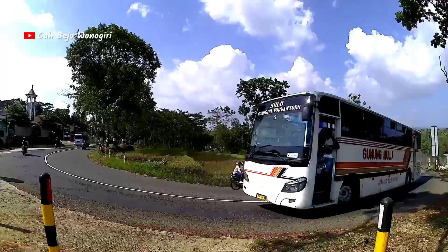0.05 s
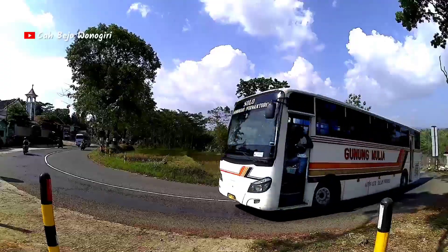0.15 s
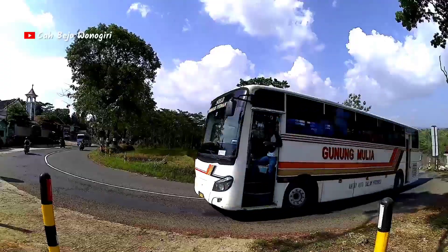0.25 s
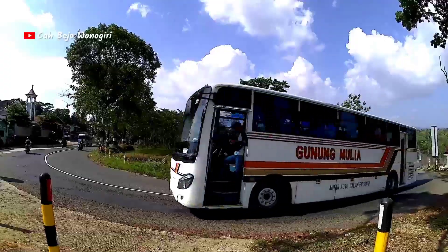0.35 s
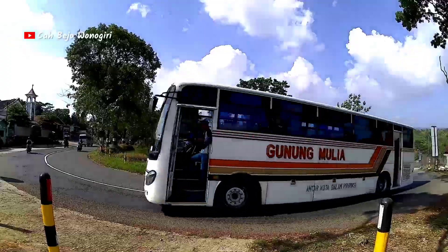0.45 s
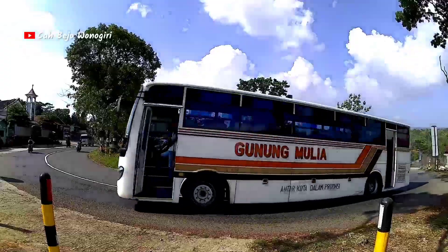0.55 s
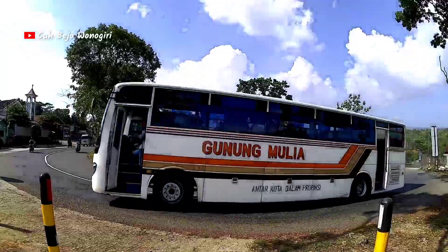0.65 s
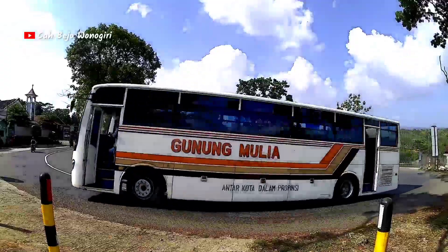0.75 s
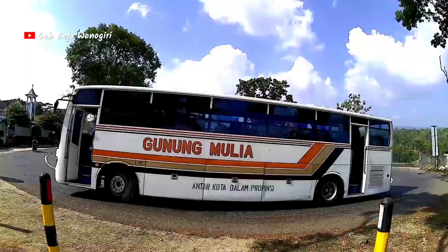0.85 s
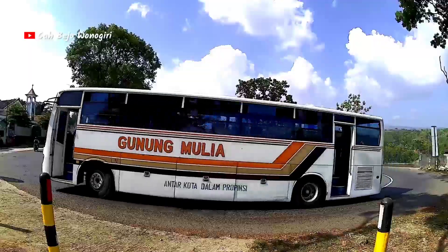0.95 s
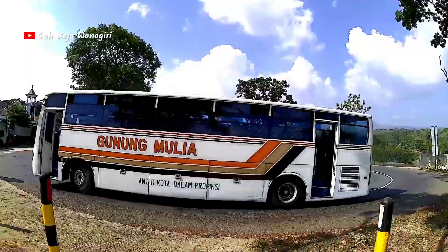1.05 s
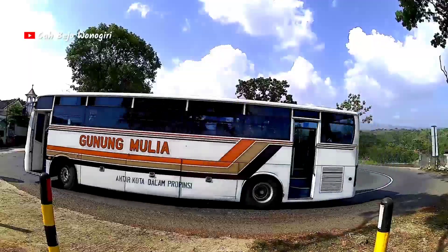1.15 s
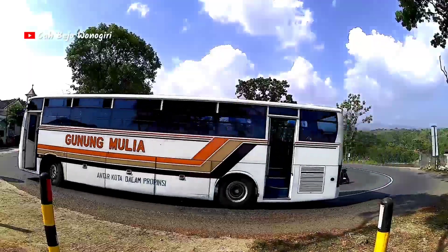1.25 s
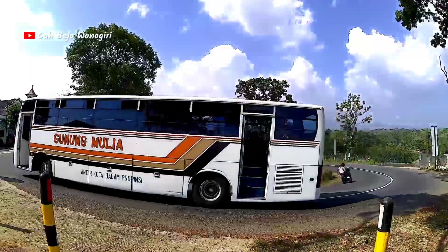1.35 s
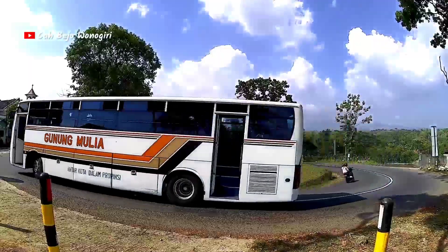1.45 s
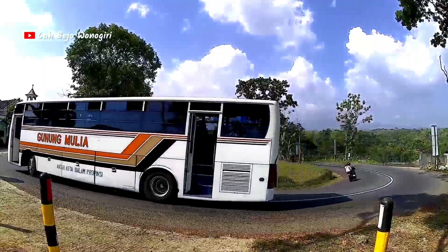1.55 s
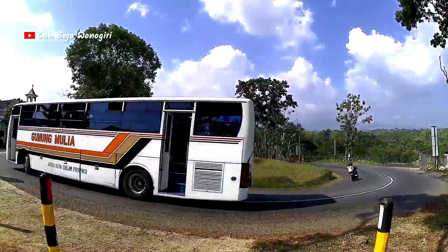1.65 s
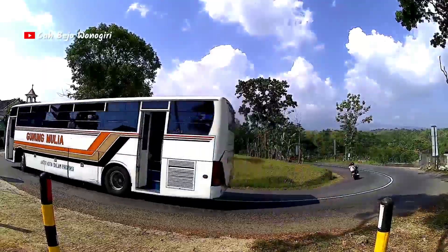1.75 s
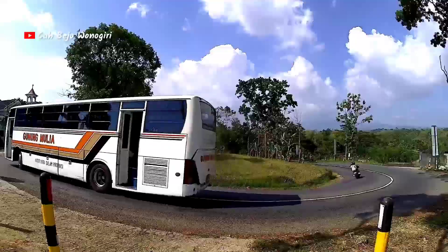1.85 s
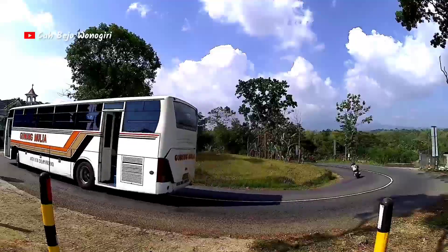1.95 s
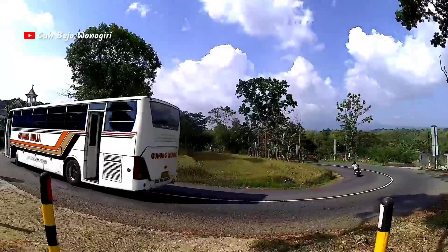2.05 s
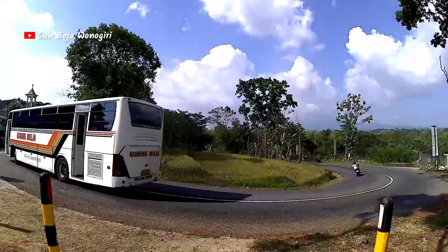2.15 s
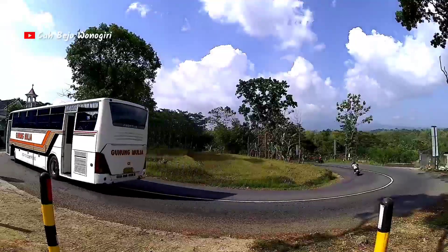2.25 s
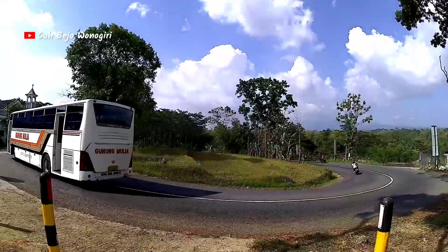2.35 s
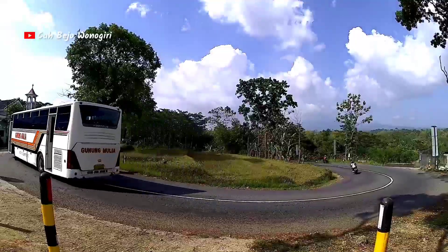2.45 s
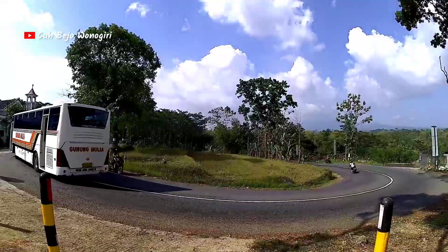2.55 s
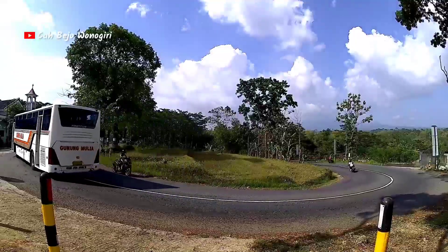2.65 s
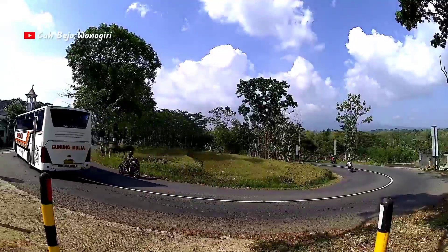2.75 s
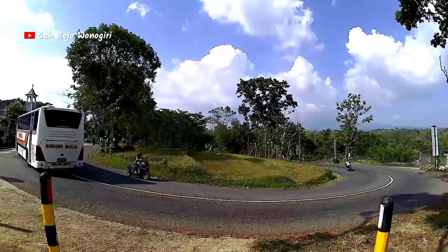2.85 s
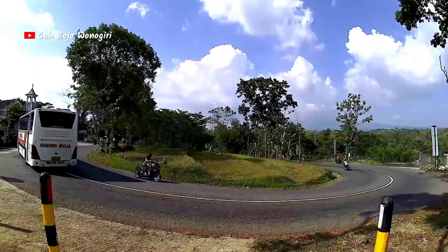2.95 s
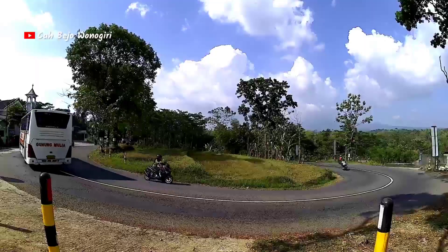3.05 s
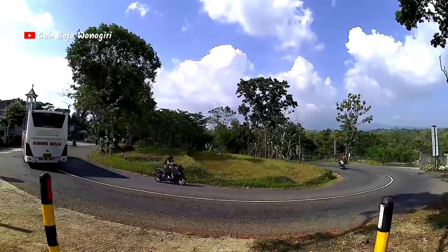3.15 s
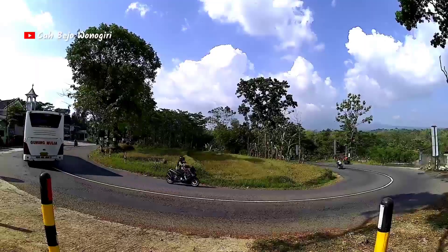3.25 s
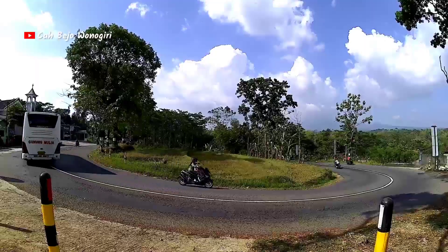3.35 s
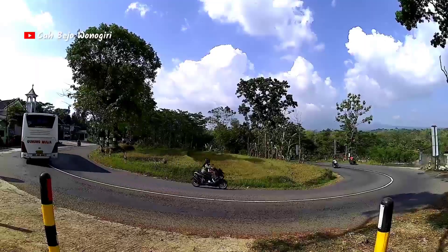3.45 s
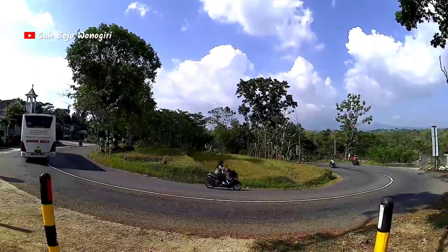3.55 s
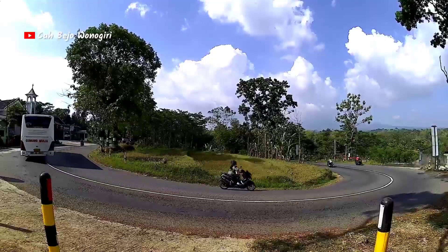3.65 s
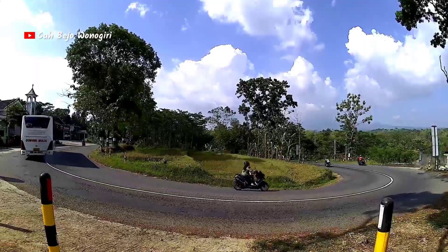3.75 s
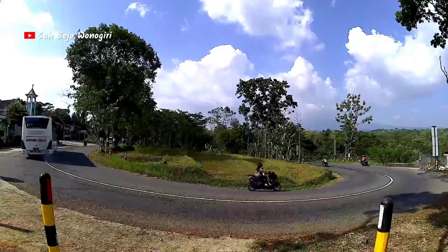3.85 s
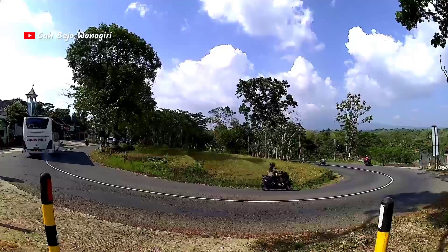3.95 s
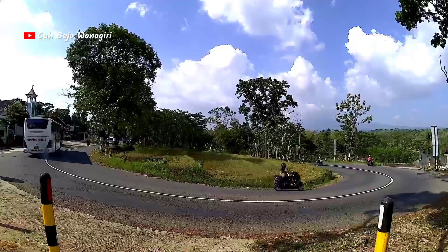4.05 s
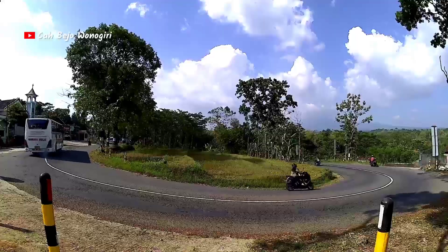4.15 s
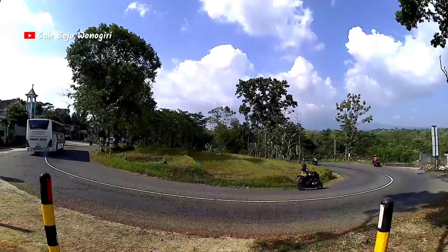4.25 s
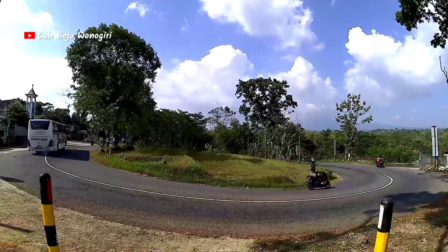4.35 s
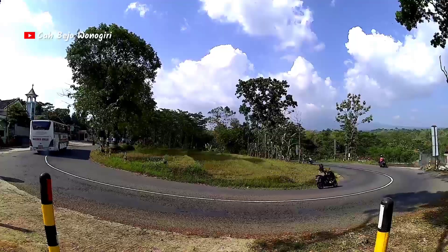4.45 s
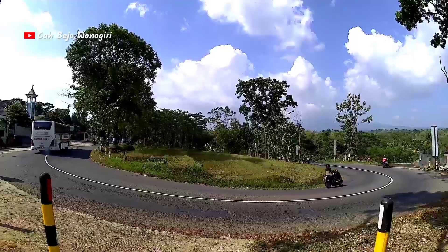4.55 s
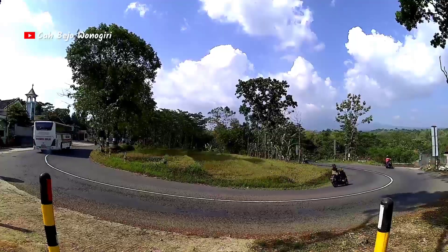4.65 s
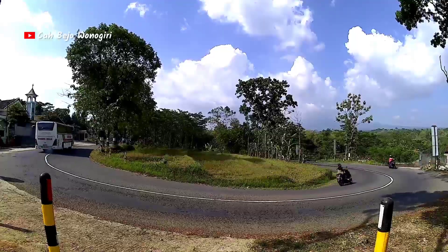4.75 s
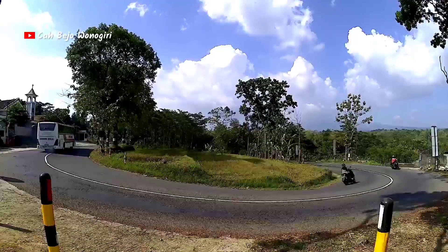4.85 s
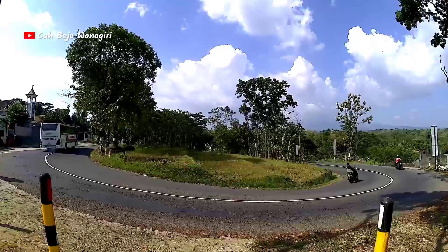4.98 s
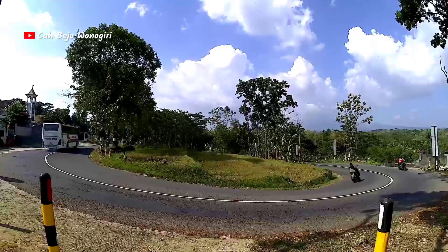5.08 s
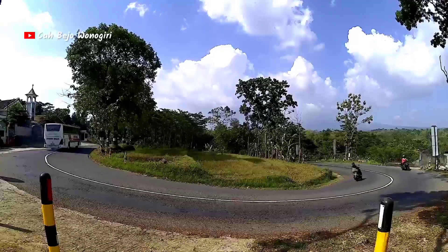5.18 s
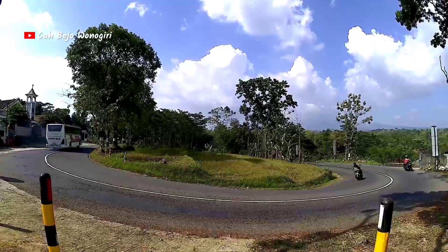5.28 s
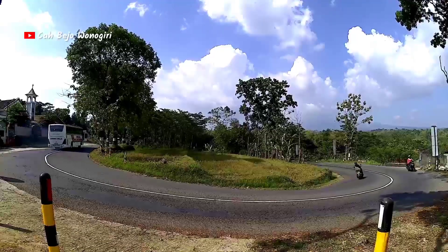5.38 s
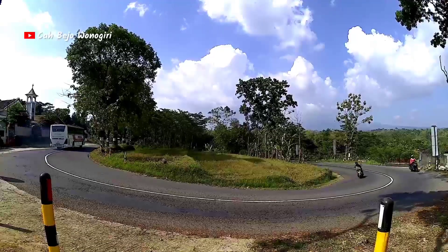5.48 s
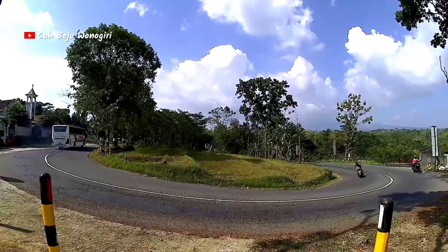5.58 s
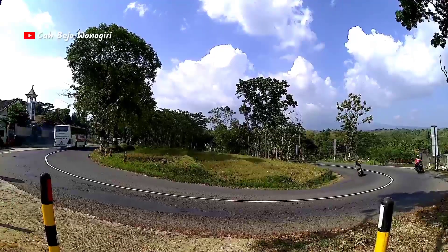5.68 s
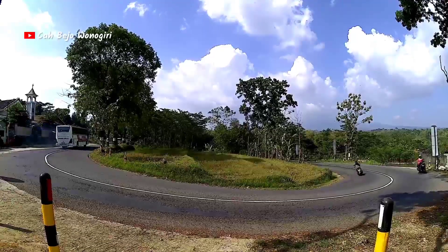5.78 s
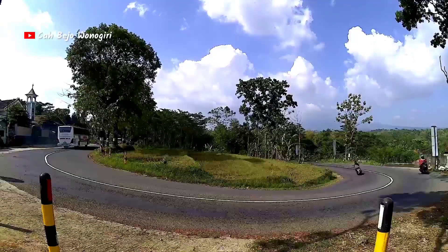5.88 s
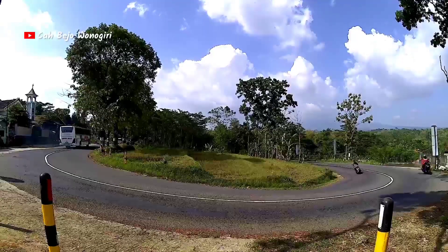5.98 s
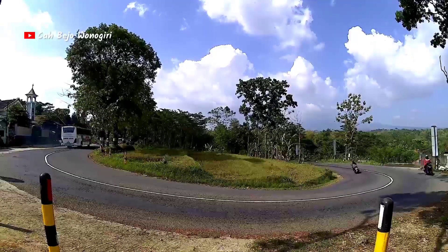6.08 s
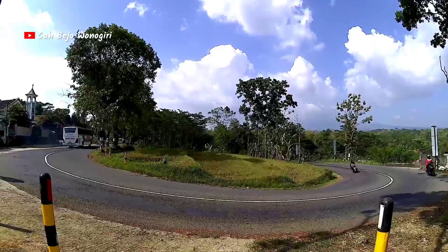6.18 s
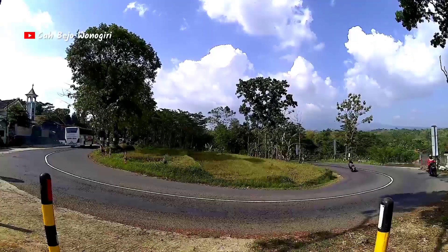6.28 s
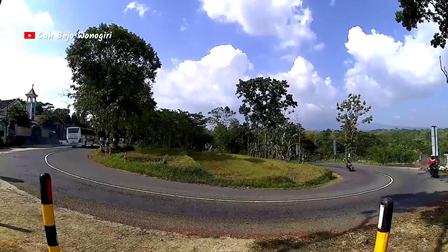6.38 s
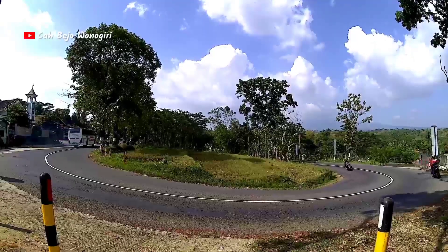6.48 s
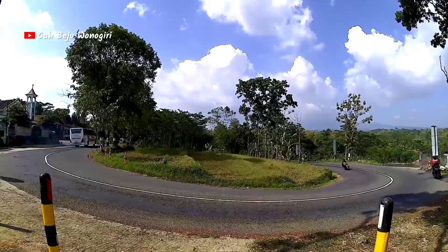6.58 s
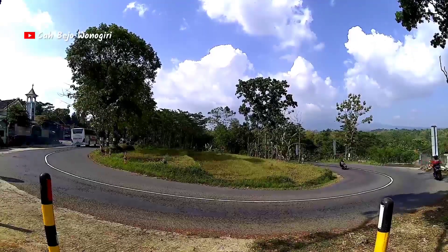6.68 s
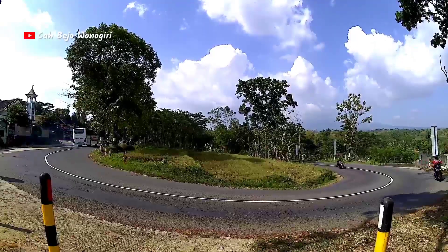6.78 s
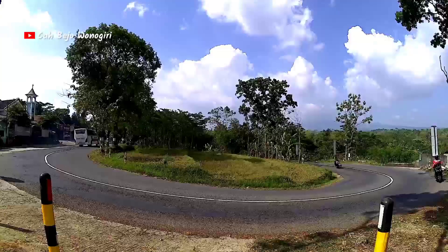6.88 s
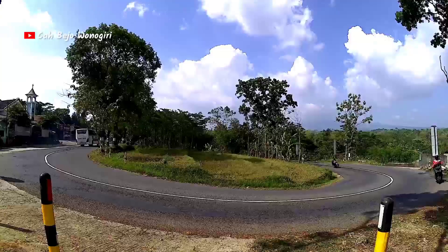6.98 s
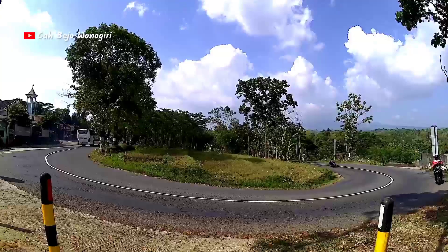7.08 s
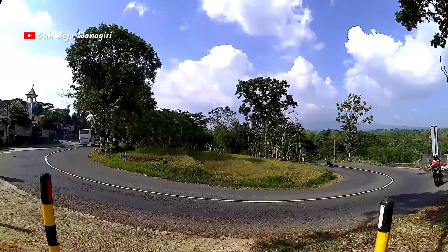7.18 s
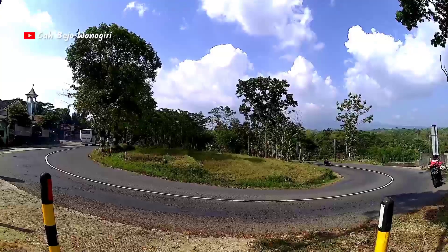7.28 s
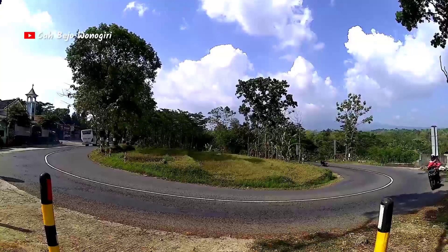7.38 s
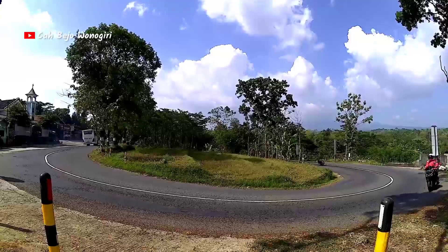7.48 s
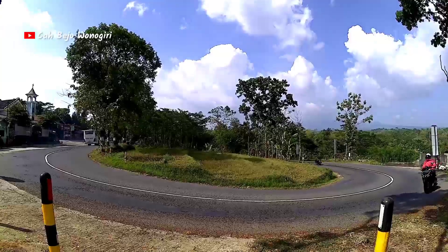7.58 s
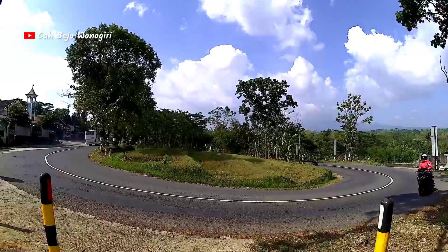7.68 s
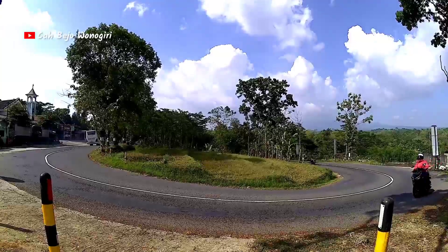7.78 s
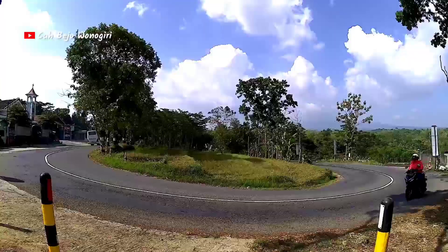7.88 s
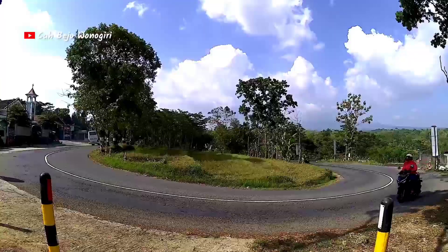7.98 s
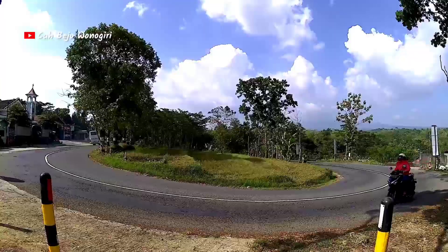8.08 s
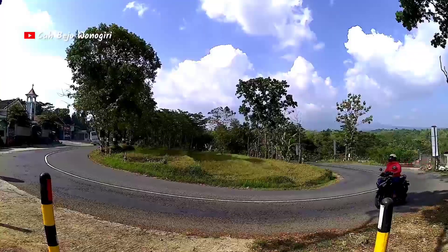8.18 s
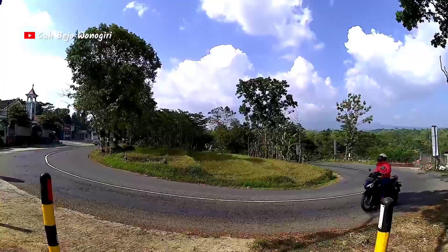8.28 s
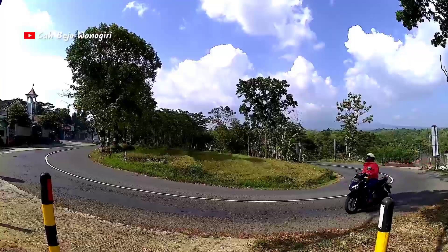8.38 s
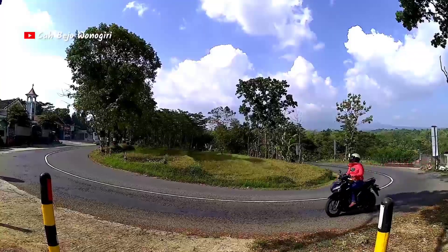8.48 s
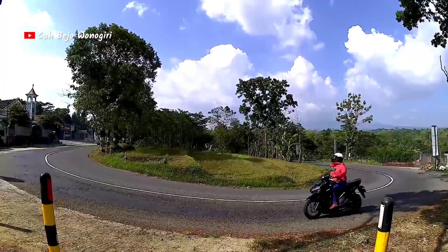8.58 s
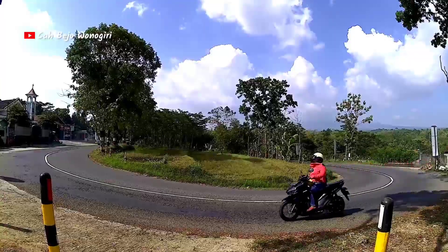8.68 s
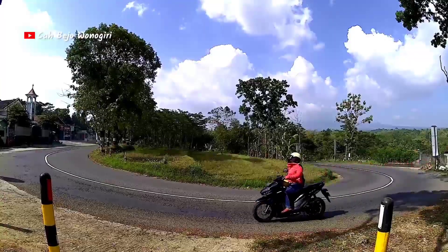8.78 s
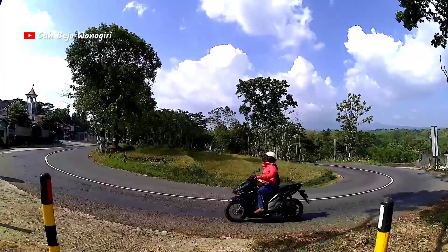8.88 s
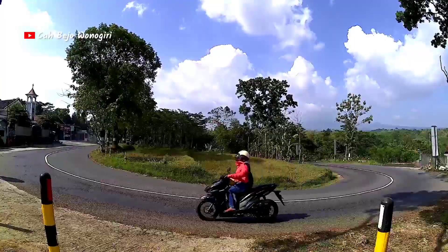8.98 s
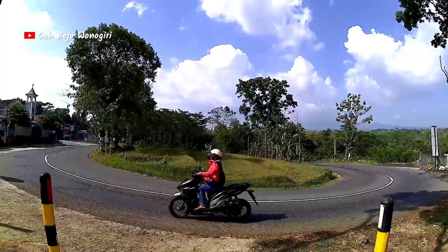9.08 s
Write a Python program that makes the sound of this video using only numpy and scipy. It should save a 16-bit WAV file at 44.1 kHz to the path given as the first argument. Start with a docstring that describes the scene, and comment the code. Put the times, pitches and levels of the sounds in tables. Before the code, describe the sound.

A heavy six-cylinder bus engine throbs loudly from the start, with tyre hiss, low rumble and a fan whine as the tail goes by. One buzzy horn tap comes about a second in. The engine then drops away up the road while a small motorbike putters across the far lane. Sharp wind buffets follow, and a nearer scooter swells last. Roadside microphone, telephone-like band, clipping on the toot and boom.

```python
"""A six-cylinder diesel bus, pulsed by its firings, rounds a bend a few metres away, toots once and pulls off uphill.
Exhaust boom and fan are tones locked to the firings; pulses ring the block; tyres and rumble are shaped noise.
Motorcycles and a scooter go by as single-cylinder pulse trains with gas hiss; wavering tones whine, a belt hisses.
Shaped noise makes wind and gusts. The narrow-band microphone overloads on the horn and the loudest boom.
"""
import sys
import numpy as np
from scipy import signal
from scipy.fft import rfft, irfft, next_fast_len
from scipy.io import wavfile
from scipy.ndimage import uniform_filter1d

SR = 44100
rng = np.random.default_rng(int(sys.argv[2]) if len(sys.argv) > 2 else 0)


def generate_wav(sig):
    """Save sig (samples, or channels by samples) to the path in sys.argv[1] as 16-bit PCM at SR."""
    pcm = np.round(np.clip(np.atleast_2d(sig).T, -1, 1) * 32767).astype(np.int16)
    wavfile.write(sys.argv[1], SR, pcm)


N = 402619
T = np.arange(N) / SR


def undb(db):
    """Decibels to gain."""
    return 10 ** (np.asarray(db) / 20)


def level(x, db=0):
    """Scale to an rms level."""
    return x * undb(db) / np.sqrt(np.mean(x ** 2))


def noise():
    """White noise."""
    return rng.standard_normal(N)


def walk(rate_hz):
    """Random levels held 1 / rate_hz seconds and smoothed twice; spread near 1."""
    hold = int(SR / rate_hz)
    steps = np.repeat(rng.standard_normal(N // hold + 1), hold)
    return 1.354 * uniform_filter1d(uniform_filter1d(steps, hold), hold)[:N]


def filtered(x, response):
    """Apply a frequency response given as a function of Hz; rms 1."""
    size = next_fast_len(N + SR // 2)
    hz = np.arange(size // 2 + 1) * SR / size + 1  # offset avoids 0 Hz
    return level(irfft(rfft(x, size) * response(hz), size)[:N])


def colour(x, points):
    """Shape by (frequency [Hz], level [dB]) points, falling away beyond both ends; rms 1."""
    hz, db = np.transpose(points)

    def response(f):
        gain = undb(np.interp(np.log(f), np.log(hz), db))
        return gain * np.minimum(1, np.minimum(f / hz[0], hz[-1] / f)) ** 2

    return filtered(x, response)


def resonate(x, modes):
    """Ring a set of (frequency [Hz], width [Hz], level [dB]) resonances; rms 1."""
    def response(f):
        return sum(undb(db) / (1 + 1j * (f * f - hz * hz) / (f * width)) for hz, width, db in modes)

    return filtered(x, response)


def passing(at_s, db, travel_s, fall_db):
    """Gain of a source driving by: falls fall_db per doubling of distance; travels its nearest distance in travel_s."""
    distance = np.hypot(1, (T - at_s) / travel_s)
    return undb(db - fall_db * np.log2(distance))


def swell(at_s, db, half_length_s):
    """Flat-topped rise and fall of gain, 6 dB down at half_length_s from its peak."""
    return undb(db) / (1 + ((T - at_s) / half_length_s) ** 4)


def firings(hz, pattern_db, scatter_db):
    """One pulse per firing, each cylinder with its own strength; also the running count of firings."""
    count = np.cumsum(hz) / SR
    at = np.flatnonzero(np.diff(np.floor(count)))
    size = undb(np.resize(pattern_db, len(at)) + scatter_db * noise()[:len(at)])
    # split each pulse over two samples to place it between them
    late = (np.ceil(count[at]) - count[at]) * SR / hz[at]
    pulses = np.zeros(N)
    pulses[at] = size * (1 - late)
    pulses[at + 1] = size * late
    return pulses, count


def puffs(pulses, decay_s):
    """A short, decaying burst of noise after each pulse."""
    envelope = signal.lfilter([1], [1, -np.exp(-1 / (decay_s * SR))], pulses)
    return envelope * noise()


def revs():
    """Bus firing rate [Hz]: a steady sag into the bend that turns smoothly into a steady climb."""
    start_hz, sag_hz_per_s, climb_hz_per_s = 75.5, 2.05, 5.0
    pull_away_s, pickup_s = 2.93, .55
    pulling_s = pickup_s * np.logaddexp(0, (T - pull_away_s) / pickup_s)
    return start_hz - sag_hz_per_s * T + (sag_hz_per_s + climb_hz_per_s) * pulling_s


# Boom at the firing rate, swelling and fading as the bus goes by: (time [s], level [dB])
BOOM = [(0, -19), (.15, -22), (.3, -12), (.95, -15), (1.16, -11), (1.38, -10), (1.5, -4.5), (1.6, -8.5),
        (1.7, -10), (1.92, -11), (2.03, -11.5), (2.15, -11), (2.45, -18.5), (3.3, -13), (3.6, -16.5),
        (3.9, -13.5), (4.2, -17.5), (5.1, -21), (5.6, -18.5), (6.2, -22.5), (8.2, -26), (9.13, -29.5)]


def exhaust_boom(count):
    """One sine cycle per firing, its level following the BOOM curve with a slight waver."""
    boom_db = np.interp(T, *np.transpose(BOOM))
    return level(np.sin(2 * np.pi * count), boom_db + 0.36 * walk(15))


# Tones locked to the engine: firing harmonics, tones between them, and the fan's third harmonic (40);
# the firing rate is 6 times the cycle rate:
# (multiple of cycle rate [-], relative level [dB], strongest at firing rate [Hz], half-width [Hz])
LOCKED_TONES = [(9, -2, 80.5, 4.5), (10, -6, 73, 3), (11, -8, 74.5, 2), (12, 2, 71.5, 1), (12, -8, 87, 4),
                (14, -3, 76.5, 4), (18, -7, 74, 1.5), (18, -6, 85, 3), (20, -8, 79, 2.5),
                (22, -4.5, 71.5, 1), (24, -9, 85, 3.5), (26, -10, 86, 3), (27, -12, 79, 3),
                (29, -12, 74, 6), (33, -10, 87, 4), (40, -7.5, 72, 2.6)]


def locked_tones(count, hz, waver_db=2.5):
    """Sines at multiples of the engine cycle rate, each swelling as the revs near its own firing rate."""
    cycles = count / 6  # six firings per engine cycle
    out = 0
    for multiple, db, best_hz, half_width_hz in LOCKED_TONES:
        nearness = 1 / (1 + ((hz - best_hz) / half_width_hz) ** 4)
        tone = np.sin(2 * np.pi * (multiple * cycles + rng.random()))
        out = out + undb(db + waver_db * walk(5.6)) * nearness * tone
    return out


# Tailpipe colour: (frequency [Hz], level [dB])
TAILPIPE_COLOUR = [(40, -19.5), (85, -11.5), (120, 0), (180, 1), (250, -6.5), (350, -7), (480, -16),
                   (700, -19), (1200, -26)]


def tailpipe(pulses, count, hz, gas_db=-4):
    """Each firing puffs gas noise through the pipe; engine-locked tones ride on it."""
    gas = colour(puffs(pulses, decay_s=0.0061), TAILPIPE_COLOUR) * undb(gas_db)
    return (gas + locked_tones(count, hz)) * passing(at_s=2, db=-21, travel_s=2.3, fall_db=5)


# Fan tones: (multiple of blade rate [-], relative level [dB])
FAN_TONES = [(1, 0), (2, -10)]


def fan(count, blades_per_firing=2.221):
    """Blade-rate harmonics geared to the crank; the rear grille beams them at the verge."""
    blade_phase = 2 * np.pi * blades_per_firing * count
    tones = sum(undb(db + 0.99 * walk(3.4)) * np.sin(k * blade_phase) for k, db in FAN_TONES)
    by = passing(at_s=4.5, db=-29, travel_s=0.8, fall_db=3)
    grille_beam = swell(at_s=2.4, db=-20, half_length_s=.6)
    return level(tones) * (by + grille_beam)


# Resonances of engine block and body panels: (frequency [Hz], width [Hz], level [dB])
BLOCK_MODES = [(500, 48, -2), (833, 150, 9), (1107, 130, -2.5), (1630, 280, -5.5), (1900, 94, -8),
               (3040, 160, -22.5)]


def block_clatter(pulses, clatter_db=-6):
    """Each firing knocks the block; loose parts add a random rattle."""
    knocks = level(pulses, -6.0) + level(puffs(pulses, decay_s=0.028))
    return resonate(knocks, BLOCK_MODES) * undb(clatter_db + 1.6 * walk(11))


# Tyre roar colour, for bus and two-wheelers: (frequency [Hz], level [dB])
ROAR_COLOUR = [(400, -8.5), (480, -8), (610, -4), (680, -8), (830, -7), (920, -9.5), (1080, -8.5),
               (1300, -11), (2030, -12), (2340, -21.5), (3050, -22.5), (3400, -29), (3850, -45)]


def tyre_roar(patchy_db=1.0, tyres_db=2.0, sway_db=0.5):
    """Tyre noise in half-octave bands, each surging on its own with the patches of the road."""
    size = next_fast_len(N)
    spectrum = rfft(colour(noise(), ROAR_COLOUR), size)
    hz = np.arange(len(spectrum)) * SR / size + 1
    place = np.clip(2 * np.log2(hz / 400), 0, 6)  # half-octaves above 400 Hz
    out = 0
    for band in range(7):
        share = np.maximum(1 - abs(place - band), 0)
        out = out + irfft(spectrum * share, size)[:N] * undb(patchy_db * walk(18))
    return level(out) * undb(tyres_db + sway_db * walk(16))


# Wheel rumble colour: (frequency [Hz], level [dB])
RUMBLE_COLOUR = [(50, -13), (90, 0), (140, 1.5), (200, -6), (260, -6), (330, -7.5), (470, -7.5), (600, -27),
                 (900, -27)]


def wheel_rumble():
    """Low rolling noise that rises and falls as the bus goes by."""
    return colour(noise(), RUMBLE_COLOUR) * passing(at_s=1.75, db=-15.5, travel_s=1.08, fall_db=3.5)


# Six cylinders in firing order: (strength [dB])
CYLINDERS_DB = [2.5, -2.5, -4, -2, -7, -4]


def bus():
    """Firings drive exhaust, fan and block; wheels roar and rumble; house fronts throw back all but the boom."""
    hz = revs()
    pulses, count = firings(hz * (1 + .001 * walk(12)), CYLINDERS_DB, scatter_db=0.5)
    # the body screens the tailpipe and fan until the tail swings round
    screen_db, tail_round_s, swing_s = -4, 0.6, 0.23
    screened = undb(screen_db / (1 + np.exp((T - tail_round_s) / swing_s)))
    rear = (tailpipe(pulses, count, hz) + fan(count)) * screened
    clatter = block_clatter(pulses)
    near_road = (clatter + tyre_roar()) * passing(at_s=1.38, db=-21, travel_s=0.69, fall_db=3.5)
    grille_clatter = clatter * swell(at_s=2.1, db=-28, half_length_s=0.68)
    running = rear + near_road + grille_clatter + wheel_rumble()
    far_bend = swell(at_s=6.15, db=-12, half_length_s=0.58)  # relative to direct sound
    return exhaust_boom(count) + running * (1 + far_bend)


# Steady breeze: (frequency [Hz], level [dB])
WIND_COLOUR = [(10, -1.5), (20, -4), (32, -0.5), (55, -6.5), (100, -13.5), (200, -27.5), (500, -45)]
# Brighter buffets: (frequency [Hz], level [dB])
BUFFET_COLOUR = [(20, -2.5), (60, -3), (130, -3.5), (200, -9.5), (350, -17), (700, -41)]
# Gaussian gusts: (time [s], level [dB], standard deviation [s], brightness [0-1])
GUSTS = [(2.097, -18.5, 1.6, 0), (2.839, -11.5, 0.054, 0.3), (5.507, -31.5, 0.2, 0.1),
         (7.012, -16, 0.036, 0.98), (7.206, -8.5, 0.019, 0.3), (7.433, -19, 0.031, 0.84),
         (7.547, -10, 0.023, 0.92), (7.547, -17, 0.44, 0.3), (7.626, -13.5, 0.014, 0.94),
         (8.034, -25, 0.027, 0.1), (8.65, -20.5, 0.079, 0)]


def wind(breeze_db=-21.5):
    """A steady breeze flutters on the microphone; each gust is split between deep and bright noise."""
    deep, bright = undb(breeze_db), 0
    for at_s, db, spread_s, brightness in GUSTS:
        gust = undb(db) * np.exp(-.5 * ((T - at_s) / spread_s) ** 2)
        deep = deep + (1 - brightness) * gust
        bright = bright + brightness * gust
    return colour(noise(), WIND_COLOUR) * deep + colour(noise(), BUFFET_COLOUR) * bright


def single_cylinder(ride, silencer, gas_db, scatter_db):
    """A small four-stroke going by: pulses through the silencer, a hiss of gas after each."""
    at_s, db, travel_s, firing_hz, rise_hz_per_s = ride
    hz = firing_hz + rise_hz_per_s * (T - at_s)
    pulses, _ = firings(hz * (1 + .002 * walk(15)), [0], scatter_db)
    highpass = signal.butter(2, 700, "high", fs=SR, output="sos")
    gas = signal.sosfilt(highpass, puffs(pulses, decay_s=0.027))
    return colour(level(pulses) + level(gas, gas_db), silencer) * passing(at_s, db, travel_s, fall_db=13)


# Far-lane rides: (nearest at [s], level [dB], time to travel nearest distance [s], firing rate [Hz], rise [Hz/s])
MOTORCYCLES = [(.45, -31.5, 0.79, 36.83, -.3), (4.349, -28.5, 0.9, 29.53, .3), (6.9, -30, 0.5, 34.14, 1.2)]
# Motorcycle silencer: (frequency [Hz], level [dB])
MOTORCYCLE_COLOUR = [(60, -18), (125, 3.5), (220, -4.5), (400, -4), (600, -15), (700, -11.5), (800, -7),
                     (900, -14), (2000, -22), (3500, -31.5)]


def motorcycles():
    """Single-cylinder machines purr by on the far lane."""
    return sum(single_cylinder(ride, MOTORCYCLE_COLOUR, gas_db=4.0, scatter_db=1.0) for ride in MOTORCYCLES)


# Two-wheelers' tones: exhaust harmonics, intakes, fans and drives:
# (frequency at peak [Hz], rise [Hz/s], level [dB], peak time [s], half-length [s], waver [share of pitch])
WHINES = [(645, 0, -29, .2, .12, .03), (838, 0, -35, 4.25, .17, .012), (788, -15, -35.5, 4.55, .45, .014),
          (1320, 90, -37, 6.8, .15, .01), (175, 8, -26.5, 7.0, .3, .02), (216, 6, -33.5, 8.35, .2, .015),
          (221, 6, -23.5, 9.05, .28, .003), (428, 0, -29.5, 8.92, .33, .003),
          (507, 0, -34.5, 8.95, .17, .004), (1367, 0, -38, 8.95, .17, .003),
          (1594, 22, -42.5, 8.4, .22, .004), (1603, 22, -32, 8.77, .14, .0035),
          (1610, 22, -31.5, 9.1, .12, .007), (1873, 0, -35, 8.92, .13, .002)]


def whines():
    """Each two-wheeler's tones swell in patches, as sines of wavering pitch and level."""
    out = 0
    for hz, rise, db, at_s, half_length_s, waver in WHINES:
        pitch_hz = (hz + rise * (T - at_s)) * (1 + waver * walk(70))
        tone = np.sin(2 * np.pi * np.cumsum(pitch_hz) / SR)
        out = out + level(tone, 1.6 * walk(22)) * swell(at_s, db, half_length_s)
    return out


# Overtones: (harmonic [-], level re fundamental [dB], flare after start [s], extra level at flare [dB])
HORN_PARTIALS = [(2, -11, .021, 12), (3, -10.5, .05, 8), (4, -10, .032, 4), (5, -12.5, .052, 2),
                 (6, -16.5, .048, 4), (7, -23, .04, 2), (8, -17, .022, 3)]
# Reflections: (delay [s], level [dB])
HORN_ECHOES = [(.0245, -19), (.0606, -8.5), (.0935, -18), (.121, -22)]


def horn(flutter_db=1.0, tail_db=-17):
    """A buzzing diaphragm, tapped once; the road, the bank and the trees throw it back."""
    start_s, attack_s, hold_s, t60_s = .9185, .008, .045, .07
    horn_hz, sharp_hz, settle_s = 406.5, 30, .007  # starts sharp and settles
    age = T - start_s
    released_s = np.maximum(age - attack_s - hold_s, 0)
    envelope = np.clip(age / attack_s, 0, 1) * np.exp(-np.log(1000) * released_s / t60_s)
    hz = horn_hz + sharp_hz * np.exp(-np.maximum(age, 0) / settle_s)
    phase = 2 * np.pi * np.cumsum(hz * (1 + .009 * walk(450))) / SR
    # the diaphragm swings first; once it strikes the pole piece the overtones flare up in turn
    bloom = np.clip(age / .013, 0, 1)
    overtones = 0
    for k, db, flare_s, extra_db in HORN_PARTIALS:
        flare_db = extra_db * swell(start_s + flare_s, 0, half_length_s=.008)
        gain = undb(db + flare_db + flutter_db * walk(90))
        overtones = overtones + gain * np.sin(k * phase + rng.uniform(0, 2 * np.pi) + .75 * walk(100))
    rasp = colour(noise(), [(400, -3), (1600, 0), (3200, -9)]) * undb(-14.5)
    toot = (np.sin(phase) + bloom * (overtones + rasp)) * undb(1.5) * envelope
    # discrete echoes have lost some treble
    dull = signal.sosfilt(signal.butter(1, 1100, fs=SR, output="sos"), toot)
    echoes = sum(undb(db) * np.interp(T - delay_s, T, dull) for delay_s, db in HORN_ECHOES)
    scatter = (noise() * np.exp(-T / .035))[:SR // 2]
    tail = signal.fftconvolve(toot, scatter / np.linalg.norm(scatter))[:N]
    return toot + echoes + undb(tail_db) * tail


# Two-wheeler tyre swells: (time [s], level [dB], half-length [s])
BIKE_TYRES = [(6.647, -32, .5), (9.15, -33.5, 0.42)]


def bike_tyres():
    """Tyres roar briefly as a two-wheeler leans through the bend."""
    return colour(noise(), ROAR_COLOUR) * sum(swell(*row) for row in BIKE_TYRES)


# Scooter silencer: (frequency [Hz], level [dB])
SCOOTER_COLOUR = [(50, -12), (118, 0), (170, -5), (280, -16), (350, -7), (390, -2), (430, -7), (470, -4),
                  (507, -7), (600, -14), (820, -13), (1300, -19), (2000, -19), (2400, -23), (3300, -29)]


def scooter():
    """A single-cylinder scooter goes by on the near lane."""
    ride = (9, -27, 0.58, 39, 0.5)  # columns as MOTORCYCLES
    return single_cylinder(ride, SCOOTER_COLOUR, gas_db=3.5, scatter_db=0.5)


# Scooter drive-belt bands: (frequency [Hz], width [Hz], level [dB])
BELT_MODES = [(1620, 290, 0.5), (1930, 150, -7.5)]


def drive_belt():
    """The scooter's belt hisses: noise through two narrow resonances, in one swell."""
    return resonate(noise(), BELT_MODES) * swell(at_s=9.15, db=-31.5, half_length_s=0.28)


def scene():
    """Everything on the bend, heard from the verge."""
    two_wheelers = motorcycles() + whines() + bike_tyres() + scooter() + drive_belt()
    return (bus() + wind() + horn() + two_wheelers)[None]


def record(dry, hiss_db=-91, crackle_db=-4):
    """The input clips, keeps a telephone-wide band, then clips overshoots with a bright tick; hiss is added."""
    ceiling, voice_band_hz, top_hz = .72, 3480, 15800
    band = signal.firwin(141, voice_band_hz, window=("kaiser", 7), fs=SR)[None]
    narrow = signal.fftconvolve(np.clip(dry, -ceiling, ceiling), band, "same")
    overshoot = narrow - np.clip(narrow, -ceiling, ceiling)
    in_band = signal.fftconvolve(overshoot, band, "same")
    tick = (overshoot - in_band) * undb(crackle_db)
    out = narrow - in_band - tick + undb(hiss_db) * noise()
    return signal.sosfilt(signal.ellip(8, .2, 70, top_hz, fs=SR, output="sos"), out)


dry = scene()
out = record(dry)
generate_wav(out)
```